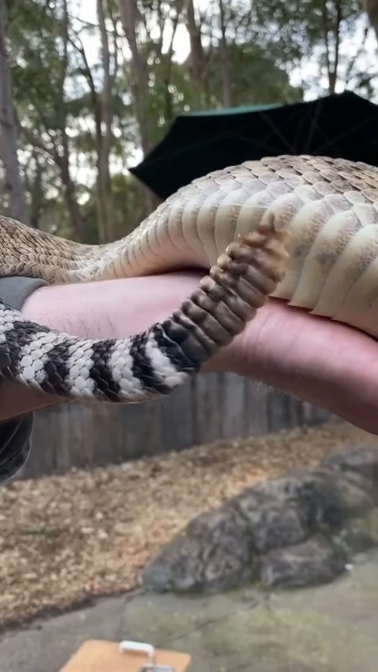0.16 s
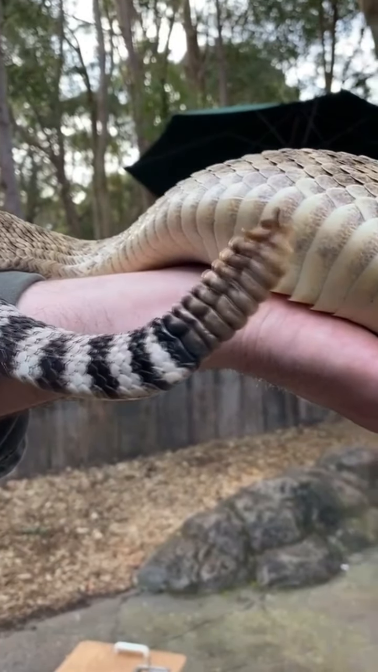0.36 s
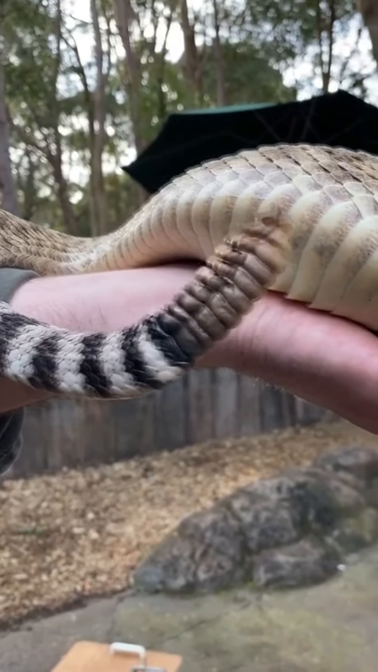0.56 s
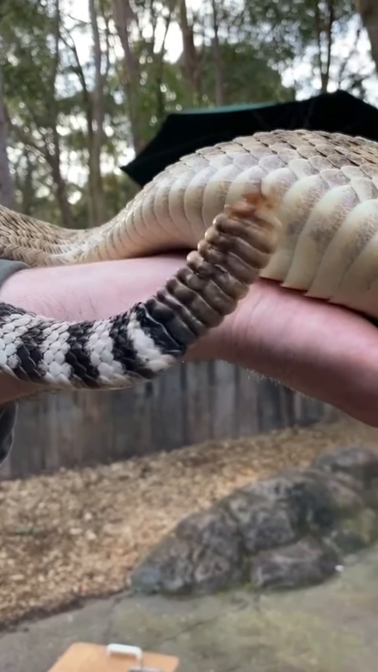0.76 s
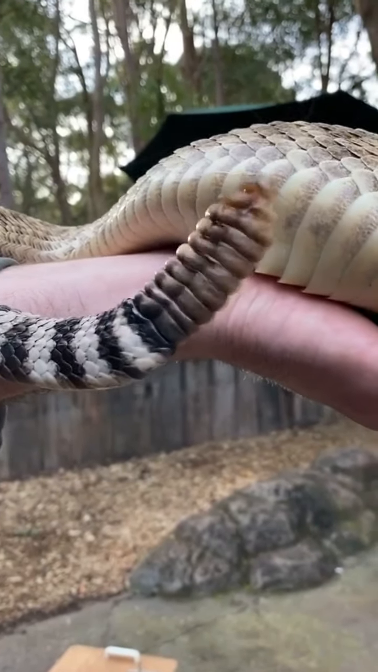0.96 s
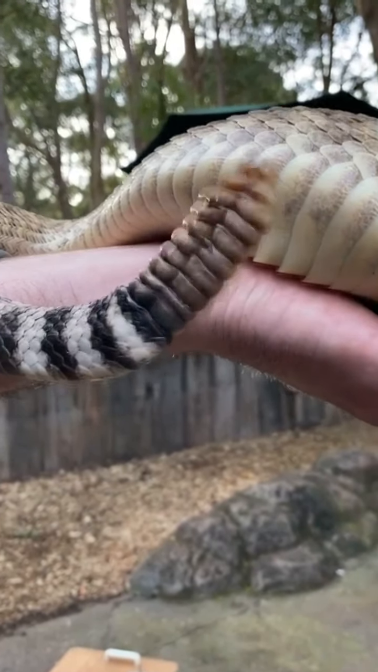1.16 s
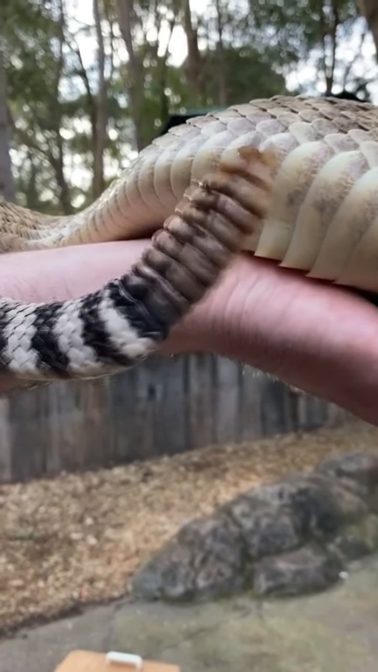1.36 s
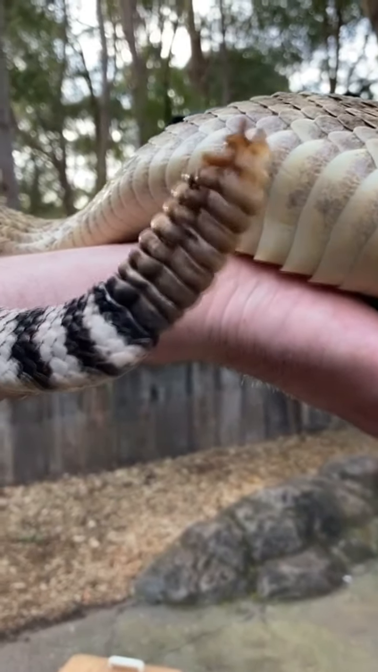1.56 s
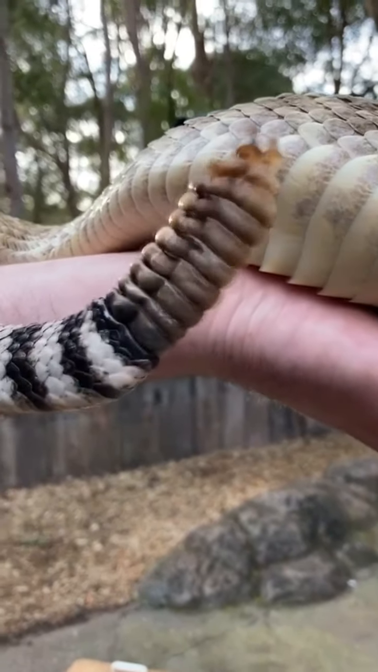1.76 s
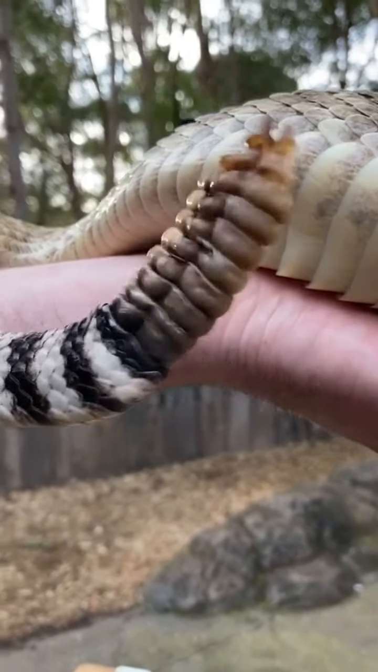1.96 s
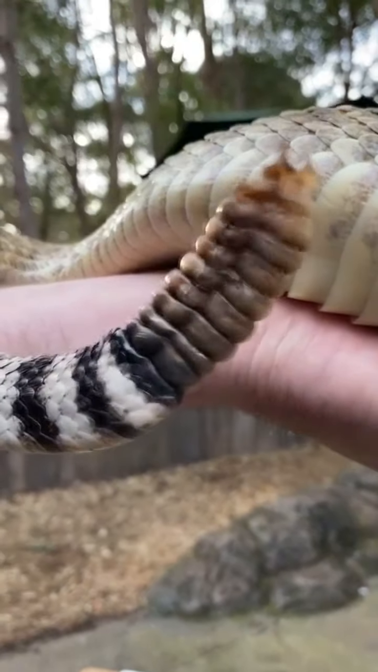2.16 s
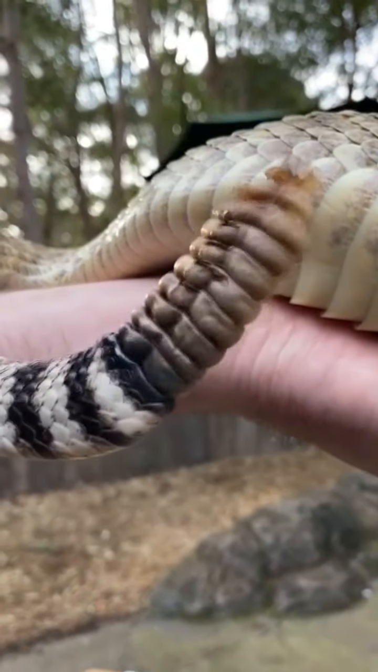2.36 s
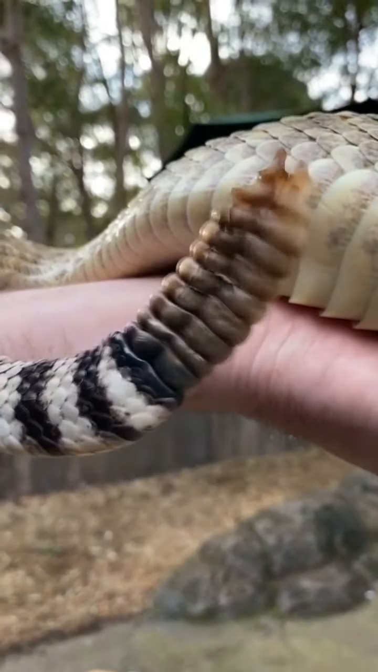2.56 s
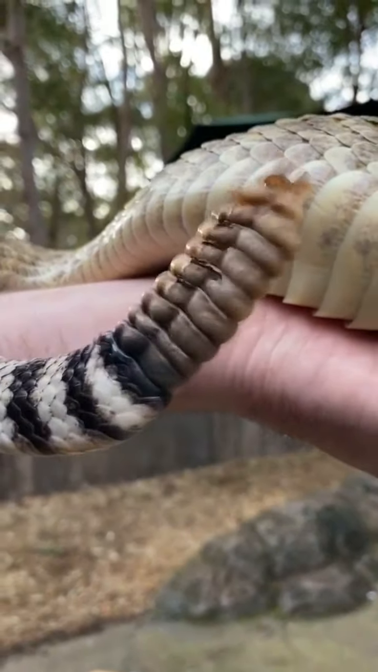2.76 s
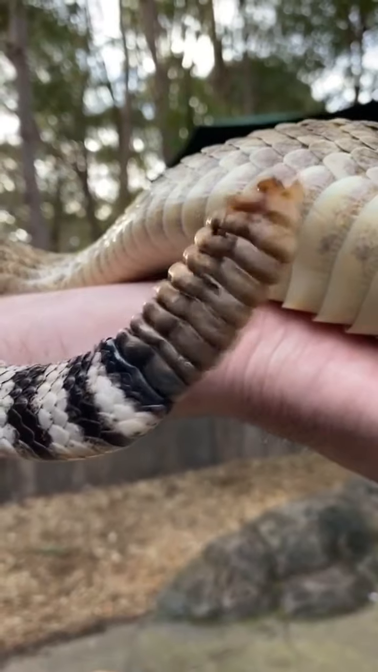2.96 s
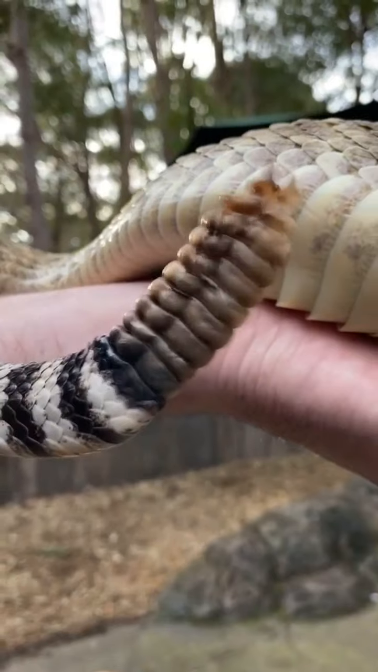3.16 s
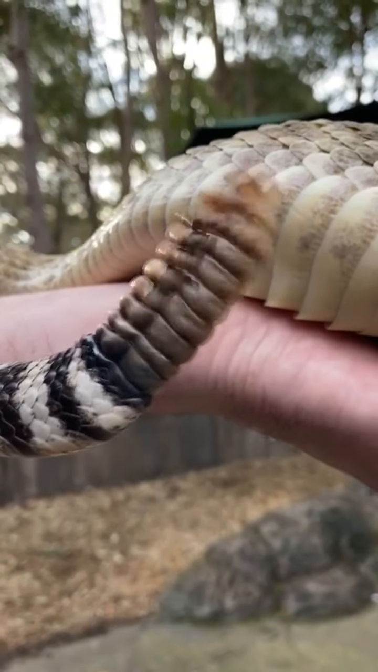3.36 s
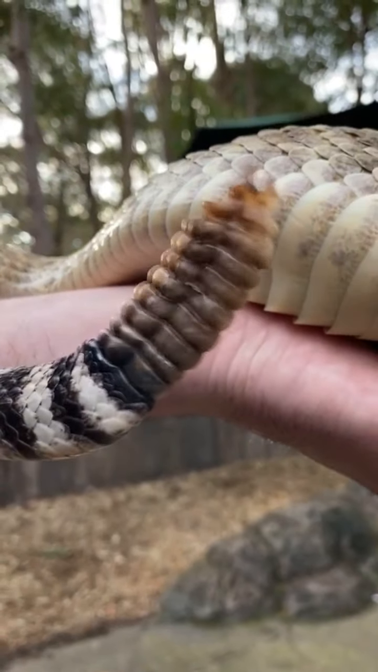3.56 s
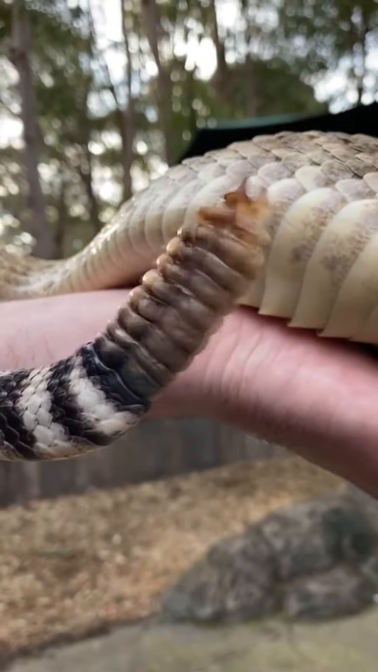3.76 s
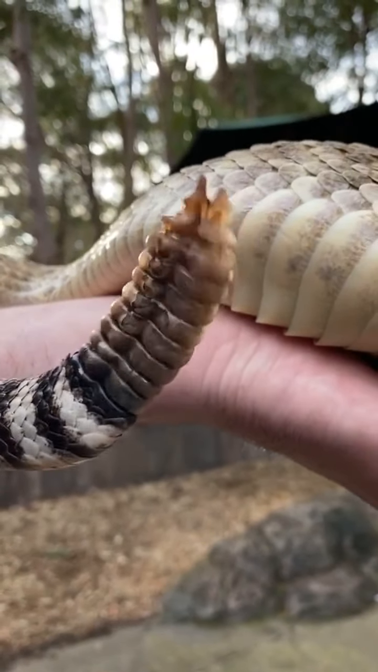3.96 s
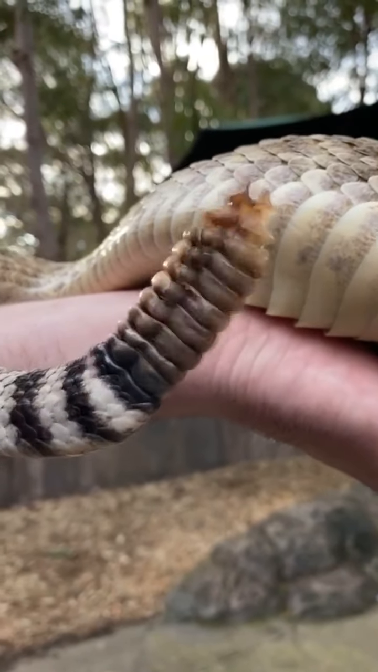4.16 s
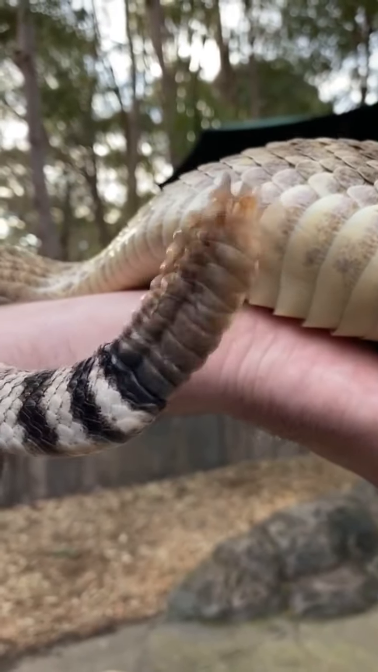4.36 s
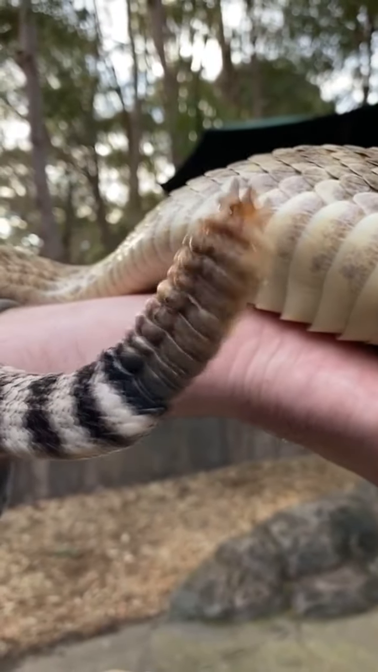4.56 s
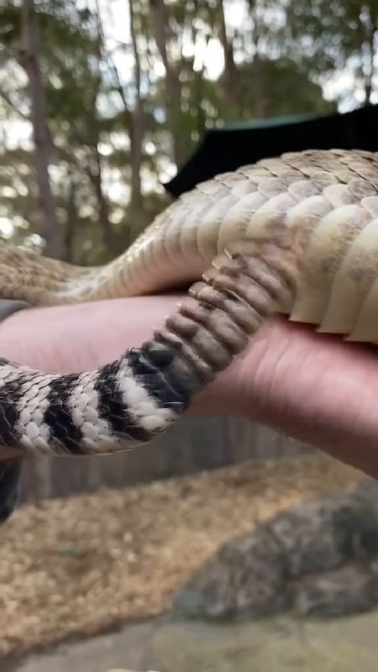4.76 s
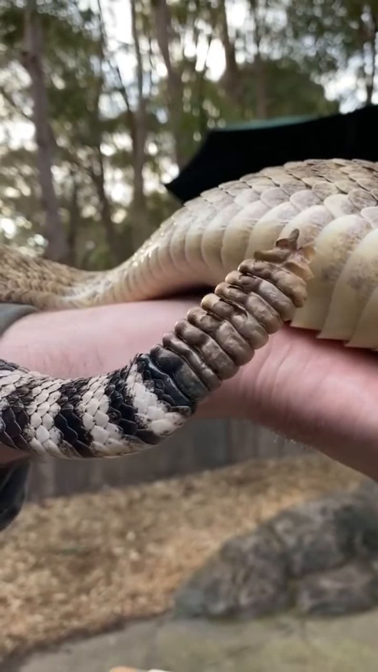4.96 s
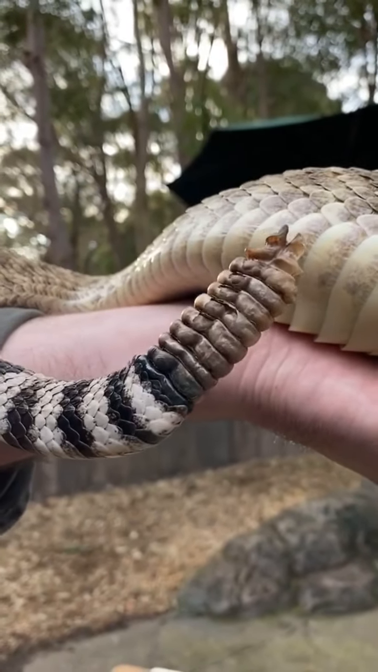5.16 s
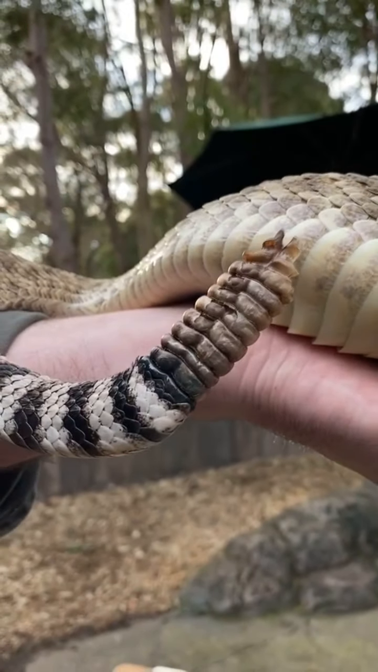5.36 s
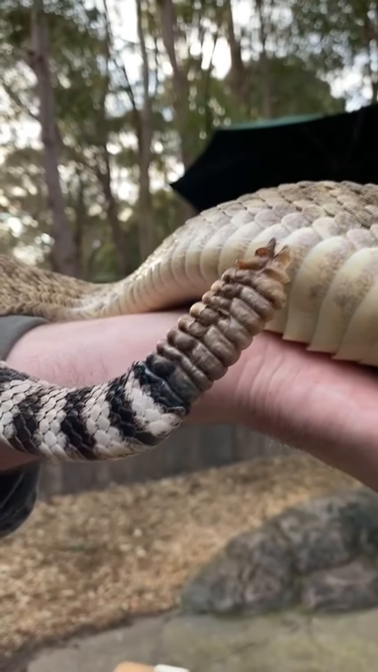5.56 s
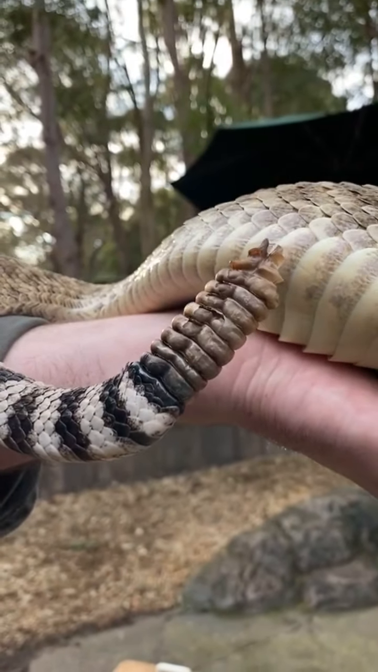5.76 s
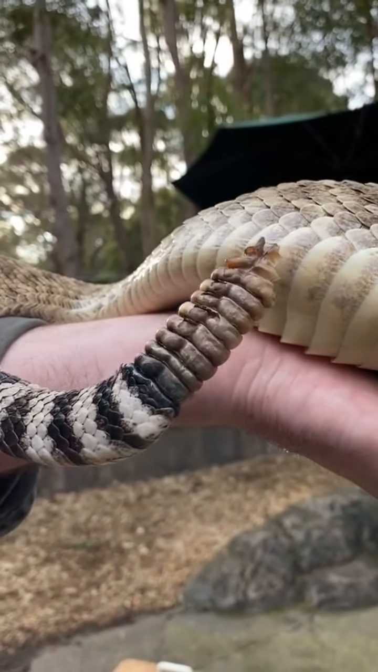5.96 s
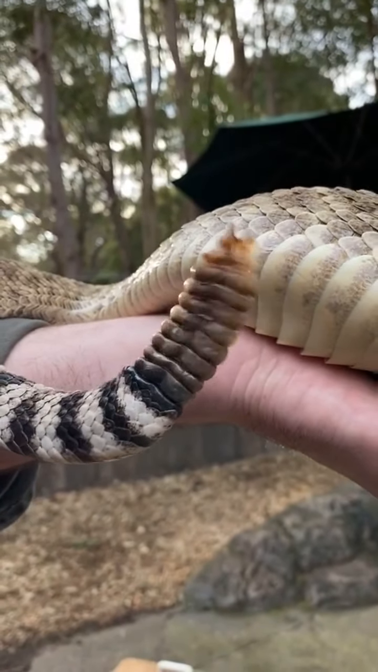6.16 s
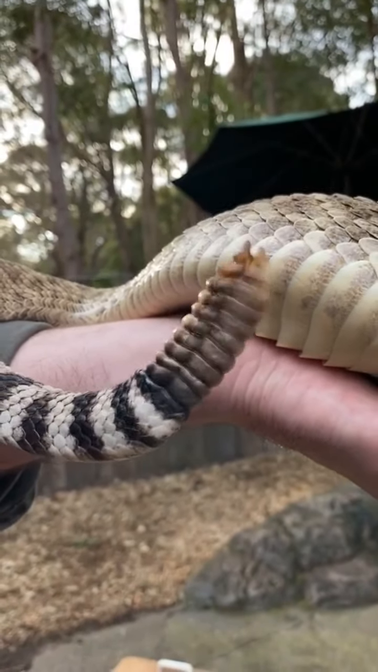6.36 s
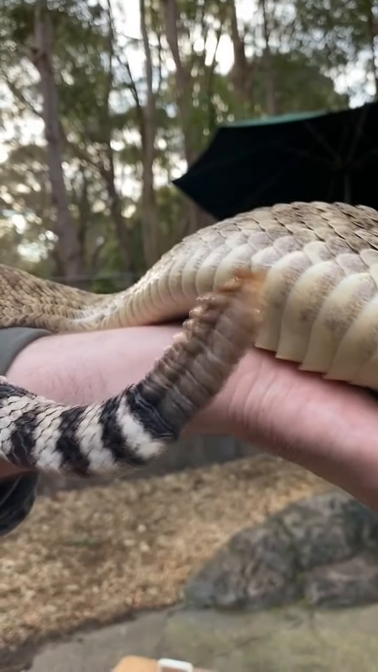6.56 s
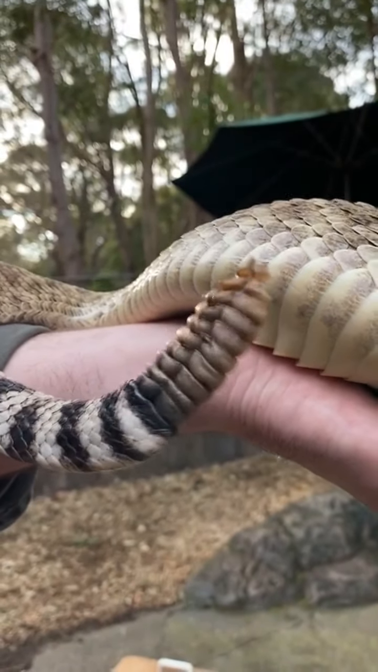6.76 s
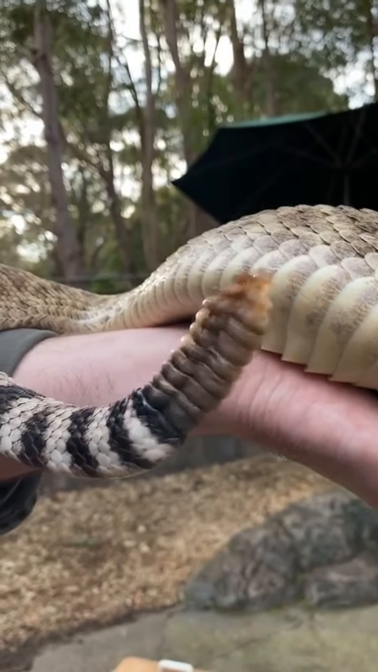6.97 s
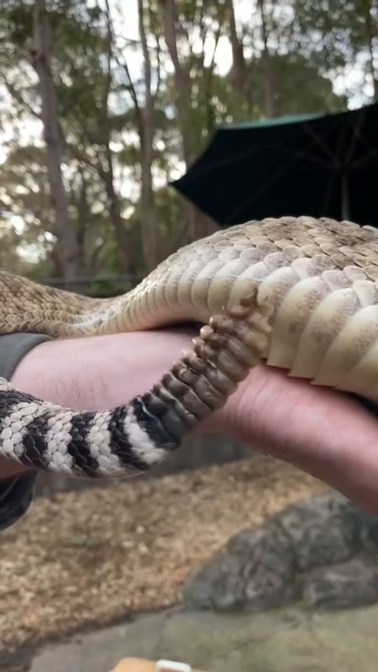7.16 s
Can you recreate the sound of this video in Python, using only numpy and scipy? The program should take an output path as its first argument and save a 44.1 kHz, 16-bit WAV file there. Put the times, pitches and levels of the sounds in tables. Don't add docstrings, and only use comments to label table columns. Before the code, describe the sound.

A rattlesnake shakes its tail close by in a dry, rapid buzz, slows to separate rattles, rests about a second, then buzzes again outdoors.

```python
import sys
import numpy as np
from scipy import signal
from scipy.fft import rfft, irfft
from scipy.io import wavfile
from scipy.ndimage import uniform_filter1d, map_coordinates

SR = 44100
rng = np.random.default_rng(int(sys.argv[2]) if len(sys.argv) > 2 else 0)


def store_wav(level_fs):
    pcm = np.round(np.clip(np.atleast_2d(level_fs), -1, 1) * 32767)
    wavfile.write(sys.argv[1], SR, pcm.T.astype(np.int16))


def gain_from_db(level_db):
    decades = np.asarray(level_db, float) / 20
    return 10 ** decades


N = 317961
TIME, HZ = np.arange(N) / SR, np.arange(N // 2 + 1) * SR / N

# [t/s, burst level/dB]
BUZZ = [(0.05, -27), (0.472, -27.5), (0.905, -25), (1.372, -25.5), (1.828, -24), (2.111, -22.5),
        (2.409, -23), (2.71, -24.5), (3.024, -23.5), (3.336, -23.5), (3.558, -23.5)]
# [t/s, burst level/dB]
BUZZ_AGAIN = [
    (6.484, -28),
    (6.577, -24.5),
    (6.679, -23),
    (6.817, -25),
    (6.995, -25),
    (7.205, -24),
]
SWINGS_DONE = [
    [0, 10, 20, 30, 40, 46, 52, 58, 64, 70, 74],
    [0, 2, 4, 7, 11, 16],
]
# [t/s, burst level/dB, slap on top level/dB, swell before it t/s]
SLOW_SWINGS = [(3.626, -24, 0, 0.032), (3.68, -26, 2.5, .029), (3.739, -23.5, 1, 0.023),
               (3.803, -25.5, 3.5, 0.032), (3.868, -25, 3.5, .027), (3.942, -29, 7.5, 0.037),
               (4.018, -30, 7, .028), (4.084, -25, 3, 0.02), (4.161, -27, -0.9, 0.028),
               (4.235, -28.5, 4, 0.024), (4.301, -27.5, 0, 0.02), (4.383, -29.5, 7, 0.023),
               (4.465, -29, 8, 0.018), (4.547, -28.5, 7.4, 0.038), (4.637, -33, 8.5, .04),
               (4.741, -28.5, 6, 0.017), (4.86, -34, 7.5, 0.024), (6.081, -31.5, 3.5, 0.025),
               (6.155, -28.5, 4.5, 0.041), (6.213, -26, 1.7, 0.027), (6.277, -29.5, 5.5, .027),
               (6.331, -25, 1.5, .026), (6.385, -26, 3, 0.024), (6.439, -27.5, 6.4, 0.023)]
# [wait t/s, fall to the lull level/dB]
SETTLING = [(.043, 0.4), (.047, 3), (.05, 8), (.06, 13.5), (.078, 16), (.087, 16.5), (.102, 31),
            (.12, 39.5)]
# [t/s, level/dB, length t/s]
RUSTLES = [
    (4.991, -70, .005),
    (5.354, -69.5, 0.012),
    (5.597, -80, .03),
]
# [f/Hz, level/dB per Hz]
SHELL_COLOUR = [(300, -22.5), (900, -25), (1400, -17.5), (2000, -11.5), (2600, -1.5), (3400, -6),
                (4300, -0.5), (5200, -4.5), (6500, -8), (7500, -5), (10500, -6), (12900, -6.5),
                (13500, -37), (15700, -33)]
# [t/s, treble level/dB]
FACING = [
    (0, 0.1),
    (1.5, 0.67),
    (3, 0.4),
    (4.7, -0.5),
    (6.1, 0),
    (6.7, .6),
    (6.95, 0),
    (7.2, -1.5),
]
# [f/Hz, level/dB per Hz]
WASH_COLOUR = [(120, -26.5), (250, 5), (500, -7.5), (900, -7.5), (1500, -14.5)]
# [f/Hz, likeness 0-1, right lag/rad, left minus right level/dB]
PORTS = [(700, .5, -.9, -2), (1000, .4, .2, -6), (1400, .89, .1, 0), (2050, .89, .2, 0),
         (3050, .6, 2.3, -2), (3350, .82, .1, .5), (3900, .9, .2, 0), (4680, .74, 2.6, -4),
         (5020, .78, 3.7, -1), (5250, .9, 6.2, .4), (6500, .86, 6.5, 0), (7200, .45, 7.2, 0),
         (10000, .54, 8.7, 0), (11500, .72, 9.4, 0)]
# [t/s, f/Hz, width f/Hz, depth level/dB]
CANCELLING = [
    (0, 3400, 170, 11),
    (1.2, 3270, 170, 10),
    (1.8, 3100, 130, 6),
    (4.9, 3150, 130, 3),
    (6.15, 3550, 300, 8),
    (6.55, 3500, 380, 10),
    (6.68, 3950, 550, 6),
    (7.2, 4100, 600, 6),
]
# [f/Hz, level/dB per Hz]
HUM_COLOUR = [(22, -32), (45, -2.5), (70, -4.5), (110, -7.5), (160, -12), (250, -18), (500, -23.5),
              (900, -27.5), (2000, -42.5), (4000, -45.5), (6500, -52), (8500, -75)]
# [f/Hz, width f/Hz, level/dB]
MOTOR_TONES = [
    (68, 13, -53.5),
    (533, 5, -79),
]
# [f/Hz, level/dB per Hz]
LEAF_COLOUR = [(500, -23), (900, -8), (2500, -5.5), (4800, -10.5), (6200, -13), (8600, -17), (12900, -12),
               (13400, -48)]
# [t/s, level/dB]
BREEZE = [
    (5.3, -82),
    (5.5, -77),
    (5.58, -62.5),
    (5.7, -65.5),
    (6.03, -64),
]


def rattle():
    level_db = shaking(last_s=0.098, rise_bend=.45, fall_bend=1.36, uneven_db=-0.12)
    for s, db, length_s in RUSTLES:
        level_db = np.maximum(level_db, db - 6 * ((TIME - s) / length_s) ** 2)
    clumps_db = 0.39 * drift(60) + .5 * drift(220)

    shell = colour(ports(*clicks(per_s=16000, spread_db=2, overlap=.9)), SHELL_COLOUR)
    shell = signal.sosfilt(signal.butter(2, 450, "high", fs=SR, output="sos"), shell)
    dull = signal.sosfiltfilt(signal.butter(1, 4500, fs=SR, output="sos"), shell)
    tilt = gain_from_db(np.interp(TIME, *np.transpose(FACING)))
    shell = dull / tilt + (shell - dull) * tilt

    smeared = np.sqrt(np.abs(uniform_filter1d(gain_from_db(2 * level_db), size=4000)))
    wash = gain_from_db(-33.5) * smeared * colour(ports(*rng.standard_normal((3, N))), WASH_COLOUR)
    return shell * gain_from_db(level_db + clumps_db + 1.66) + wash


def shaking(last_s, rise_bend, fall_bend, uneven_db):
    tops, burst_db, slap_db, swell_s = swings(uneven_db)
    gaps = np.append(np.diff(tops), .045)
    fall_db = np.interp(gaps, *np.transpose(SETTLING))
    rest = np.argmax(gaps)
    next_swell_s = np.append(swell_s[1:], 0.023)
    lulls = tops + gaps - np.clip(next_swell_s, .005, .8 * gaps)
    lulls[rest] = tops[rest] + last_s
    silent_s, wake_s = lulls[rest] + .03, tops[rest + 1] - .028

    times = np.ravel([tops, lulls], "F")
    times = np.insert(times, 2 * rest + 2, [lulls[rest] + 0.025, wake_s])
    levels = np.ravel([burst_db, burst_db - fall_db], "F")
    levels = np.insert(levels, 2 * rest + 2, [-110, -62])

    place = np.interp(TIME, times, np.arange(len(times) - 0.))
    k = np.minimum(place.astype(int), len(times) - 2)
    bent = (place - k) ** np.where(levels[k + 1] > levels[k], rise_bend, fall_bend)
    level = levels[k] + (levels[k + 1] - levels[k]) * (1 - np.cos(np.pi * bent)) / 2
    near = np.searchsorted((tops[1:] + tops[:-1]) / 2, TIME)
    level = level + 1.45 * slap_db[near] * np.exp(-((TIME - tops[near]) / .005) ** 2)
    return np.where((TIME > silent_s) & (TIME < wake_s), -110, level)


def swings(uneven_db):
    rows = [np.array(SLOW_SWINGS)]
    for table, done in zip((BUZZ, BUZZ_AGAIN), SWINGS_DONE):
        s, db = np.transpose(table)
        each = np.arange(done[-1] + 1)
        chance = rng.standard_normal((len(each), 3))
        top_s = np.interp(each, done, s)
        burst_db = np.interp(each, done, db) + uneven_db * chance[:, 0]
        slap_db = 1.6 + .8 * chance[:, 1]
        swell_s = 0.023 + 0.0033 * chance[:, 2]
        rows.append(np.transpose([top_s, burst_db, slap_db, swell_s]))
    rows = np.vstack(rows)
    return rows[np.argsort(rows[:, 0])].T


def clicks(per_s, spread_db, overlap):
    sizes = gain_from_db(spread_db * np.minimum(rng.exponential(1, N), 4))
    sizes = sizes * (rng.random(N) < per_s / SR)
    struck = sizes * rng.choice([-1, 1], (3, N)) + 1e-18
    pitches_hz = np.linspace(20, 126, 20) ** 2
    dealt = rng.integers(0, 20, N)
    favour = rng.standard_normal((20, N // 1300 + 2))
    favour_db = 2.5 * map_coordinates(favour, [dealt, np.arange(N) / 1300], order=1)
    rung = 0
    for k, hz in enumerate(pitches_hz):
        hits = struck * gain_from_db(favour_db) * (dealt == k)
        rung = rung + resonate(hits, hz, overlap * 11 * np.sqrt(hz))
    tick = struck * np.std(rung) / np.std(struck)
    return rung + gain_from_db(-17) * tick


def ports(shared, own_left, own_right):
    alike, lag, lean_db = over_hz(PORTS)
    apart = np.minimum((HZ / 430) ** 2.9, 1)
    alike = 1 - apart * (1 - alike)
    side = np.array([[1], [-1]])
    common = np.sqrt(alike) * np.exp(.5j * lag * apart * side) * rfft(shared)
    own = np.sqrt(1 - alike) * rfft([own_left, own_right])
    return irfft((common + own) * gain_from_db(lean_db * apart / 2 * side), N)


def yard():
    hum = gain_from_db(-51.5 - 3.0 + 2.0 * drift(3)) * colour(ports(*rng.standard_normal((3, N))), HUM_COLOUR)
    for hz, width_hz, db in MOTOR_TONES:
        tone = resonate(rng.standard_normal(N), hz, width_hz)
        hum = hum + gain_from_db(db) * rms_one(resonate(tone, hz, width_hz))
    breeze_db = np.interp(TIME, *np.transpose(BREEZE)) + 0.99 * drift(7.2)
    leaves = colour(ports(*rng.standard_normal((3, N))), LEAF_COLOUR)
    return hum + gain_from_db(breeze_db) * leaves


def rms_one(x):
    return x / np.sqrt(np.mean(x ** 2) + 1e-20)


def over_hz(table):
    hz, *columns = np.transpose(table)
    return [np.interp(np.log(HZ + 1), np.log(hz), c) for c in columns]


def colour(x, spectrum):
    return rms_one(irfft(rfft(x) * gain_from_db(over_hz(spectrum)[0]), N))


def drift(rate_hz):
    r = np.exp(-2 * np.pi * rate_hz / SR)
    noise = rng.standard_normal(N + SR)
    return rms_one(signal.lfilter([1], [1, -2 * r, r * r], noise)[SR:])


def resonate(x, hz, width_hz):
    r = np.exp(-np.pi * width_hz / SR)
    turn = 2 * r * np.cos(2 * np.pi * hz / SR)
    return signal.lfilter([(1 - r * r) / 2, 0, (r * r - 1) / 2], [1, -turn, r * r], x)


def scene():
    return rattle() + yard()


def joint_stereo(x, under_db, waver_db, thrift_db, attack_db):
    frame = 2048
    window = np.sqrt(np.hanning(frame + 1)[:-1])
    hz, s, (mid, side) = signal.stft([x[0] + x[1], x[0] - x[1]], SR, window, frame)
    pitch = hz[:, None]
    cancel_s, *columns = np.transpose(CANCELLING)
    centre_hz, width_hz, depth_db = (np.interp(s, cancel_s, c) for c in columns)
    mid = mid * gain_from_db(-depth_db * np.exp(-((pitch - centre_hz) / width_hz) ** 2))

    band = (np.sqrt(hz + 300) / 2.6).astype(int)
    sums = (band[:, None] == np.arange(band.max() + 1)).T * 1.
    chance = uniform_filter1d(rng.standard_normal((len(sums), len(s))), size=3) * np.sqrt(3)
    mid_power = sums @ abs(mid) ** 2 + 1e-20
    side_power = sums @ abs(side) ** 2 + 1e-20
    lead_db = 10 * np.log10(mid_power / side_power) + waver_db * chance
    power_db = 10 * np.log10(np.sum(abs(side) ** 2, axis=0) + 1e-20)
    attack = np.diff(power_db, prepend=0) + waver_db / 2 * chance[0] > attack_db
    lead_db[38:] += thrift_db * (chance[1] - 1.1 + 2.5 * attack)
    lead_db[:9] = 0

    kept = np.where(pitch < 13100, 1, gain_from_db(7.5) * attack)
    outside = abs(pitch - centre_hz) > .7 * width_hz
    mid = mid * (outside | (depth_db + waver_db * chance[2] < 10.5))
    mid = mid * kept * (lead_db > -under_db)[band]
    side = side * kept * (lead_db < under_db + 1.5)[band]
    return signal.istft([mid + side, mid - side], SR, window, frame)[1][:, :N] / 2


def band_limit(x):
    return signal.sosfilt(signal.butter(12, 15820, fs=SR, output="sos"), x)


def record(dry):
    joined = joint_stereo(dry, under_db=9, waver_db=2, thrift_db=3.5, attack_db=4)
    return band_limit(joined)


dry = scene()
out = record(dry)
store_wav(out)
```